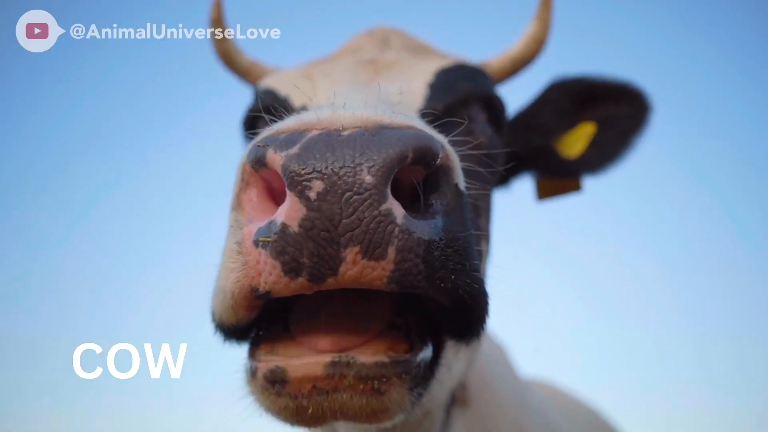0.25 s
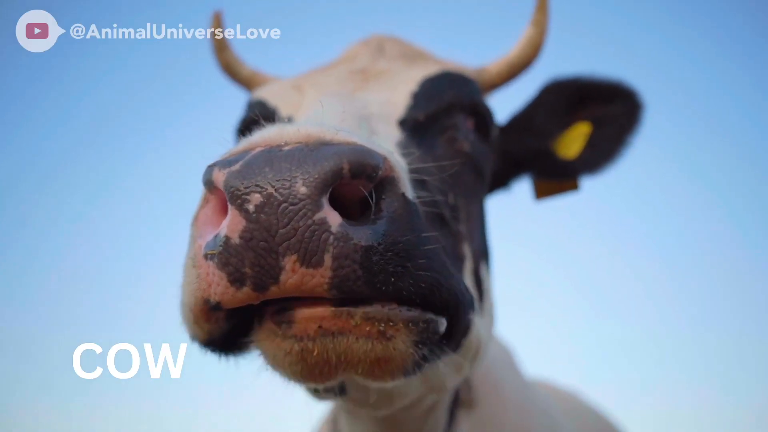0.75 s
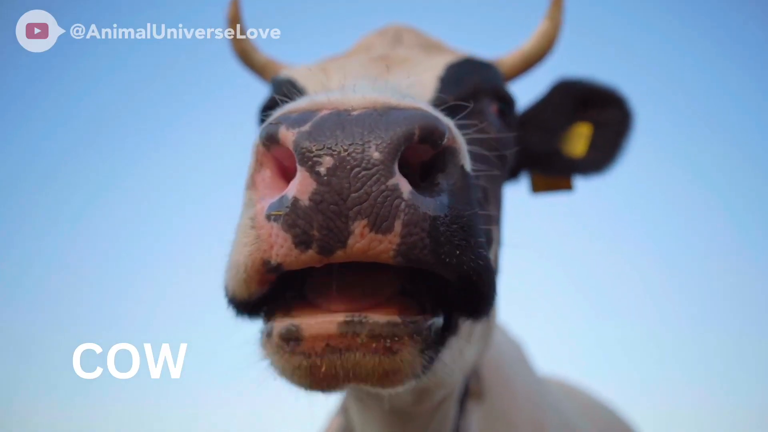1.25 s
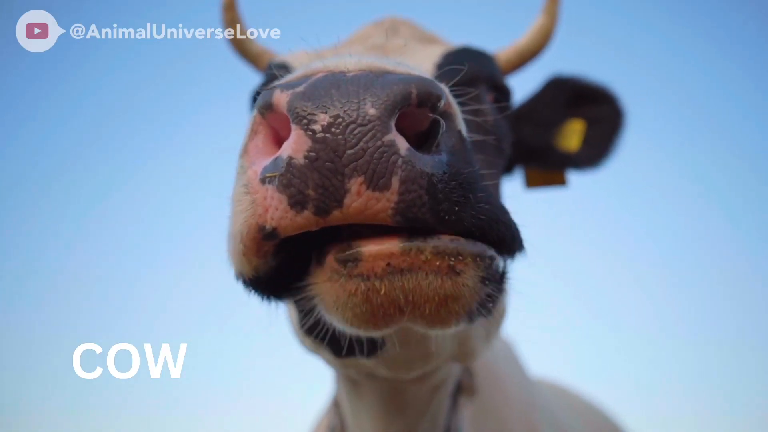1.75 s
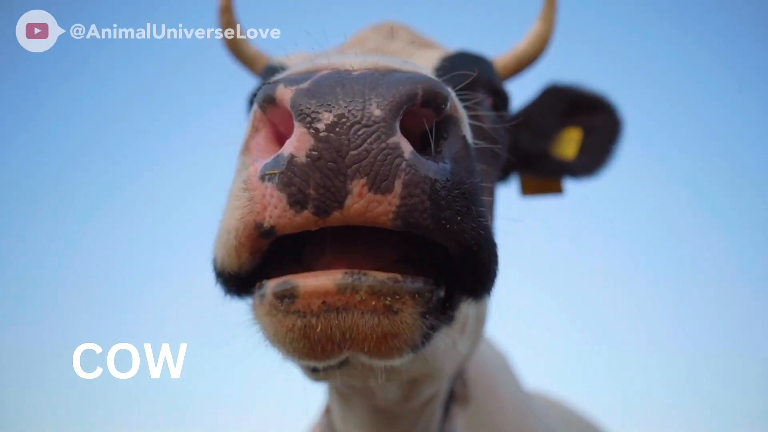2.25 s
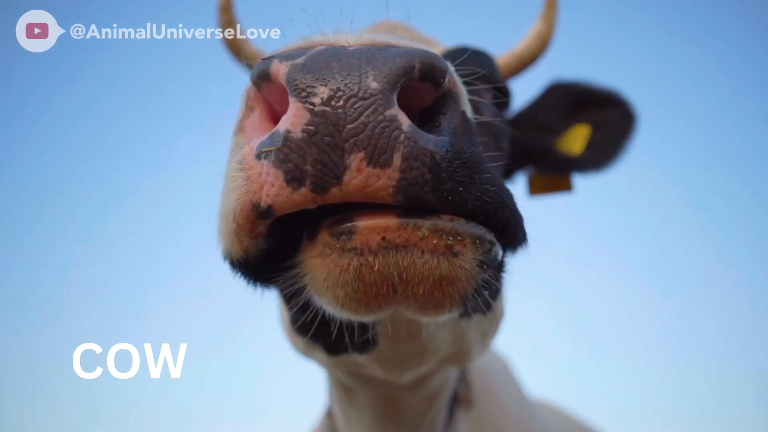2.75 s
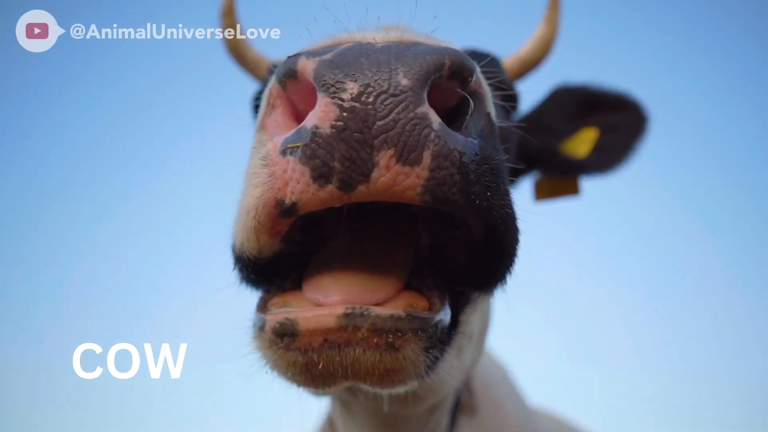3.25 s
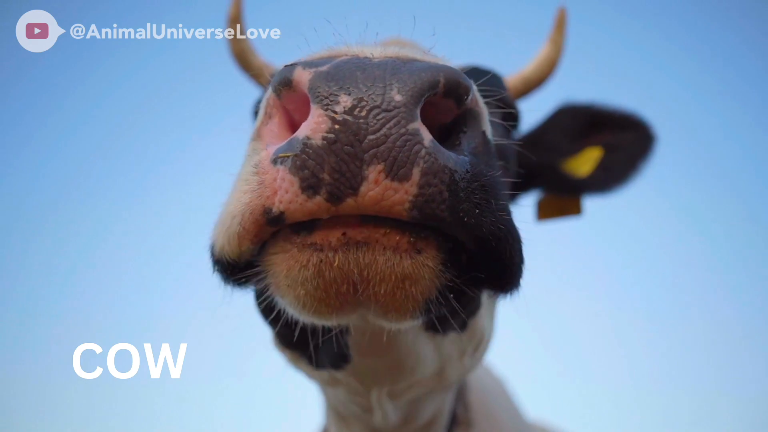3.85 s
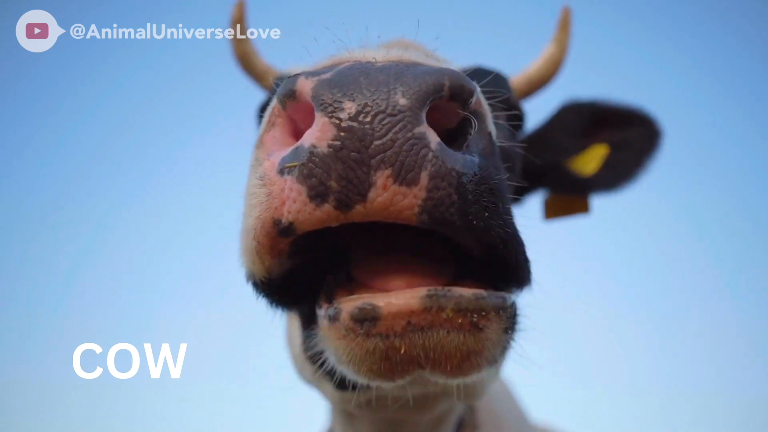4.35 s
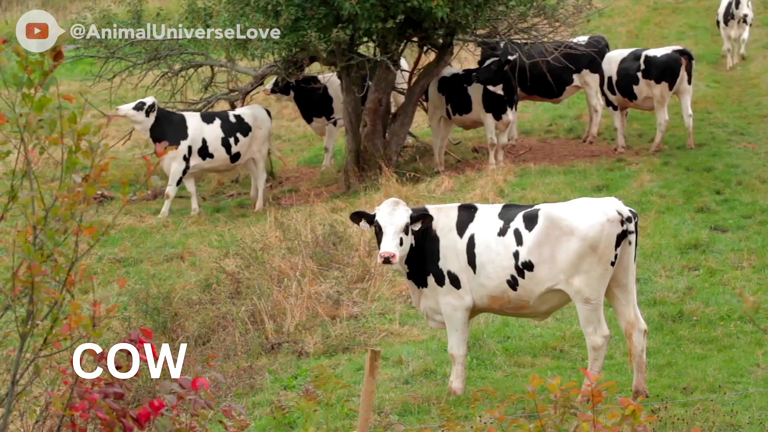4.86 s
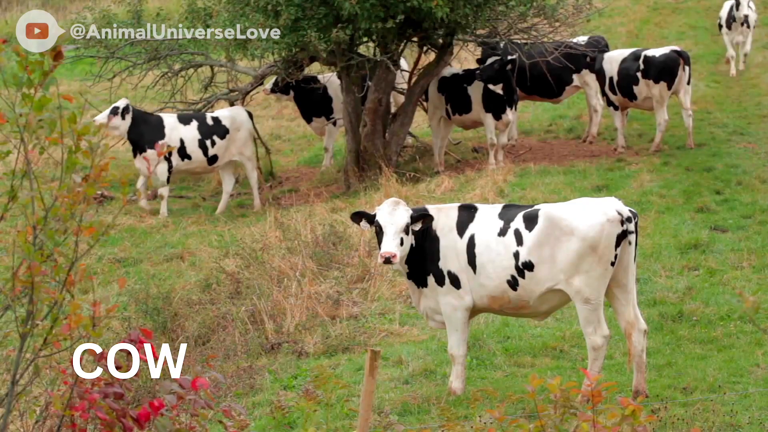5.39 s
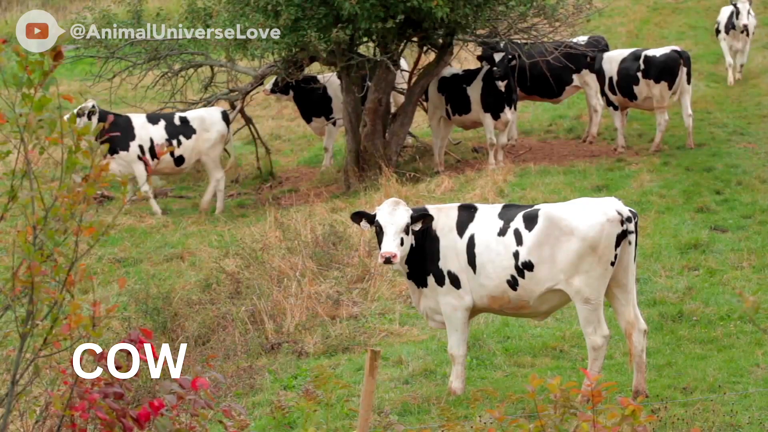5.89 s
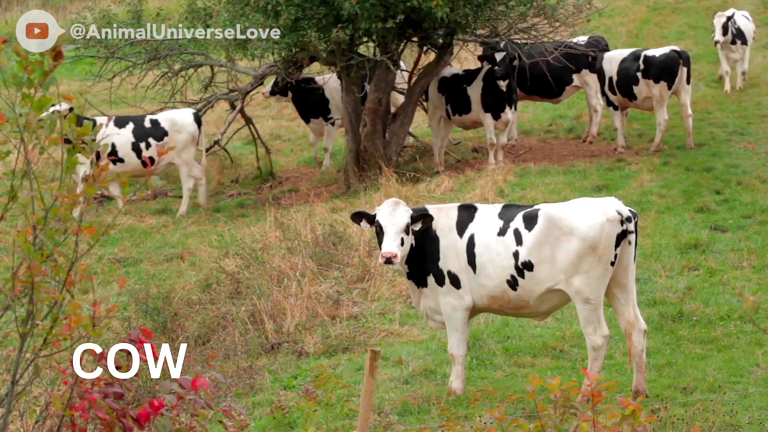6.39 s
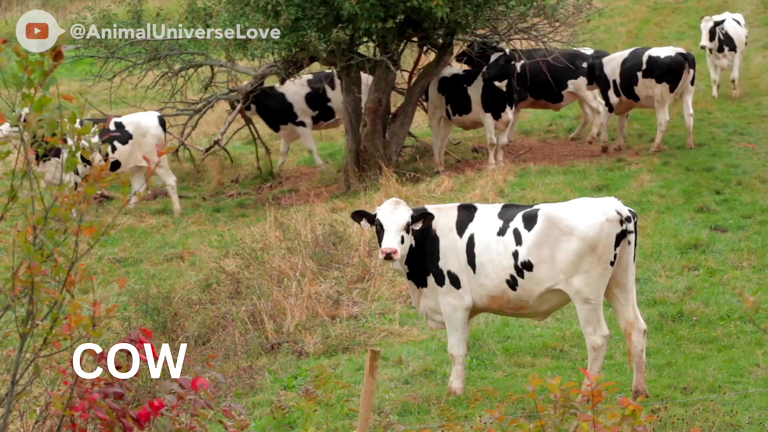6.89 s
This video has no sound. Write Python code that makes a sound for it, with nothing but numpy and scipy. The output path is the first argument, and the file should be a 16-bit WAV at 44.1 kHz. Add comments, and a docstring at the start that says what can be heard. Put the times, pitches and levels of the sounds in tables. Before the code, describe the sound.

Outdoors in a pasture with soft hiss and faint bird whistles, a cow very near the microphone blows air through its nose, chews and gives one hoarse bellow that cracks upward and breaks off. Field wash rises; it blows and chews again. Then three moos come from the herd, with two dull bumps and an irregular tinny cowbell clanking through the later part.

```python
"""Cattle in a pasture, over a soft outdoor hiss and the low wash of the field. Distant birds whistle as gliding tones.
A cow close by blows through her nose (shaped noise), chews (ringing knocks and crunches) and bellows once: vocal fold
pulses pass her throat resonances, her voice cracks upward and breaks. The field wash comes up and she blows and
chews again. Then three moos follow from the herd, made the same way as the bellow, while two dull bumps fall and
a sheet-metal cowbell clanks as ringing modes. Small dry ticks of noise are scattered in between."""
import sys
import numpy as np
from scipy import signal
from scipy.fft import rfft, irfft, next_fast_len
from scipy.io import wavfile
from scipy.ndimage import uniform_filter1d

SR = 44100
rng = np.random.default_rng(int(sys.argv[2]) if len(sys.argv) > 2 else 0)


def transcribe(u):
    """Save the signal u as a 16-bit wav file named by the first command-line argument.

    u: samples, shape (n,) or (channels, n), limited to [-1, 1]; the rate is SR.
    q: integer samples, one column per channel.
    """
    v = np.clip(np.atleast_2d(u).T, -1, 1)
    q = np.round(v * 32767).astype(np.int16)
    wavfile.write(sys.argv[1], SR, q)


N = 314433
T = np.arange(N) / SR  # time in seconds
HZ = np.fft.rfftfreq(4096, 1 / SR)  # frequency grid of the filters

# How the open field gets louder. Each row: time in seconds, level in dB.
FIELD_RISE = [(1.9, -70.5), (2.3, -40.5), (4.2, -38), (4.7, -35.5)]


def amp(db):
    """Decibels to gain."""
    return 10 ** (np.asarray(db) / 20)


def unit(x):
    """Scales to an rms of 1."""
    return x / np.sqrt(np.mean(x ** 2) + 1e-20)


def ramp(t, start, end):
    """Goes from 0 at start to 1 at end, and stays there."""
    return np.clip((t - start) / (end - start), 0, 1)


def bump_curve(t, centre, width):
    """A smooth hump of height 1 around centre."""
    return np.exp(-((t - centre) / width) ** 2)


def curves(rows, t):
    """Every column of a table, joined by straight lines in time."""
    s, *columns = np.transpose(rows)
    return [np.interp(t, s, c) for c in columns]


def colour(points):
    """Gain on the HZ grid from (Hz, dB) points, joined on a log frequency scale."""
    f, db = np.transpose(points)
    return amp(np.interp(np.log(HZ + 1), np.log(f + 1), db))


def through(x, gain):
    """Passes x through a causal (minimum-phase) filter with this gain on the HZ grid."""
    both_sides = np.r_[gain, gain[-2:0:-1]]
    log_gain = np.log(np.maximum(both_sides, 1e-5))
    taps = np.fft.ifft(np.exp(np.conj(signal.hilbert(log_gain)))).real
    return signal.oaconvolve(x, taps)[:len(x)]


def noise(points, size):
    """Noise of rms 1 with a given spectrum."""
    return unit(through(rng.standard_normal(size), colour(points)))


def wander(size, hz):
    """Slow random drift of rms 1, with little left above hz."""
    padded = next_fast_len(size)
    f = np.fft.rfftfreq(padded, 1 / SR)
    spectrum = rfft(rng.standard_normal(padded)) * np.exp(-(f / hz) ** 2)
    return unit(irfft(spectrum, padded)[:size])


def ring(modes, t):
    """Free ringing of (Hz, dB, t60 in seconds) modes, each a sine that dies away."""
    return sum(amp(db) * np.exp(-np.log(1000) * t / t60) * np.sin(2 * np.pi * hz * t)
               for hz, db, t60 in modes)


def resonate(x, hz, width):
    """A steep resonance of gain 1 that follows the curve hz."""
    # turn the wanted pitch down to 0 Hz, smooth twice, turn it back up
    turn, r = np.exp(2j * np.pi * np.cumsum(hz) / SR), np.exp(-np.pi * width / SR)
    smooth = signal.lfilter([1 - r], [1, -r], x / turn)
    return 2 * (turn * signal.lfilter([1 - r], [1, -r], smooth)).real


def add(mix, s, sound):
    """Mixes a sound in at time s."""
    part = mix[max(round(s * SR), 0):][:len(sound)]
    part += sound[:len(part)]


def outdoors(swell_db=1, apart_db=-15, right_db=3):
    """An even hiss, wide in the treble, and the field's low noisy wash, which comes up a little to the right."""
    # Spectrum of the hiss. Each row: frequency in Hz, relative level in dB.
    hiss_colour = [(59, -62), (100, -9), (350, -2.5), (471, -8), (768, -10.5), (1060, -9), (2270, -8),
                   (2580, -6.5), (10700, -14.5), (16000, -25)]
    # Width of the hiss. Each row: frequency in Hz, side level in dB relative to the centre.
    hiss_width = [(2500, -20), (5000, -28.5), (8000, -7), (15000, -7.5)]
    # Spectrum of the open field. Each row: frequency in Hz, relative level in dB.
    field_colour = [(25, 5), (55, -3), (90, 8.5), (125, -2), (170, -0.5), (300, 0.5), (600, -5),
                    (1300, -10.5), (2500, -16), (6000, -23), (15000, -33.5)]
    hiss_db = -45.5

    centre = noise(hiss_colour, N)
    side = through(noise(hiss_colour, N), colour(hiss_width))
    hiss = np.array([centre + side, centre - side])

    wash, apart = noise(field_colour, N), amp(apart_db) * noise(field_colour, N)
    field = np.array([amp(-right_db / 2) * (wash + apart), amp(right_db / 2) * (wash - apart)])
    level_db, = curves(FIELD_RISE, T)
    return amp(hiss_db) * hiss + amp(level_db + swell_db * wander(N, hz=8.7)) * field


def hum():
    """A faint, wavering hum far across the field: a narrow band of low noise that comes up with the field."""
    # One resonance: frequency in Hz, width in Hz, level in dB relative to the field.
    hz, width, db = (119.2, 9.9, -9)
    level_db, = curves(FIELD_RISE, T)
    return amp(level_db + db) * unit(resonate(rng.standard_normal(N), np.full(N, hz), width))


def birds(warble=0.035):
    """Thin whistles far away: sine tones that glide in pitch and warble at random."""
    # Each row: start in seconds, length in seconds, start pitch in Hz, end pitch in Hz, level in dB.
    chirps = [(0.027, 0.14, 2450, 2320, -51), (2.498, 0.078, 2430, 2280, -53),
              (3.741, 0.11, 2800, 2640, -49), (3.895, 0.051, 3330, 2920, -48.5),
              (3.988, 0.038, 2370, 2220, -49), (4.332, 0.11, 2325, 2270, -47.5)]
    out = np.zeros(N)
    for s, length, start_hz, end_hz, db in chirps:
        size = int(length * SR)
        hz = np.linspace(start_hz, end_hz, size) * (1 + warble * wander(size, hz=120))
        whistle = np.sqrt(2) * np.sin(2 * np.pi * np.cumsum(hz) / SR)
        add(out, s, amp(db) * whistle * signal.windows.tukey(size, .5))
    return out


def snorts(flutter_db=2, buffet_rise_db=14, buffet_fall_db=18, hiss_rise_db=8, hiss_fall_db=14, rise_s=0.15):
    """Air hisses out of the cow's nostrils and buffets the microphone: a quick rise, a hold and a long fall."""
    # Each row: start in seconds, length in seconds, hold of the buffeting in seconds, buffeting in dB, hiss in dB.
    blows = [(.09, 0.74, 0.1, -25.5, -37), (3.03, 0.69, 0.19, -25, -37)]
    # Spectrum of the buffeting. Each row: frequency in Hz, relative level in dB.
    buffet_colour = [(12, -29), (20, 3.5), (65, -2), (178, -10), (354, -22.5), (526, -20), (783, -26.5),
                     (857, -29), (1500, -43), (1950, -50), (3300, -120)]
    # Spectrum of the nostril hiss. Each row: frequency in Hz, relative level in dB.
    nose_colour = [(300, -6), (600, -2), (1200, 1), (2500, 7.5), (5000, 1.5), (9000, 3.5), (13000, 0),
                   (16000, -0.5)]
    out = np.zeros(N)
    for s, length, hold, buffet_db, hiss_db in blows:
        t = np.arange(0, length, 1 / SR)
        still_to_rise = ramp(t, rise_s, 0)
        low_db = buffet_db - buffet_rise_db * still_to_rise - buffet_fall_db * ramp(t, rise_s + hold, length)
        high_db = hiss_db - hiss_rise_db * still_to_rise - hiss_fall_db * ramp(t, rise_s, length)
        buffet = noise(buffet_colour, len(t)) * amp(low_db + flutter_db * wander(len(t), hz=29.6))
        hiss = noise(nose_colour, len(t)) * amp(high_db)
        add(out, s, (buffet + hiss) * signal.windows.tukey(len(t), .12))
    return out


def ticks(level_db=-1, decay_s=0.00078):
    """Tiny dry ticks: bright noise that dies away within a few thousandths of a second."""
    # Each row: time in seconds, relative level in dB.
    tick_times = [(0.1107, -22.5), (1.148, -26), (1.233, -24), (4.6832, -22.5), (4.7815, -19),
                  (4.8272, -28), (5.1892, -25)]
    out, t = np.zeros(N), np.arange(1024) / SR
    for s, db in tick_times:
        tick = noise([(1500, -30), (5000, -2.0), (9000, 2.0), (16000, -9)], len(t)) * np.exp(-t / decay_s)
        add(out, s, amp(db + level_db) * tick)
    return out


def chewing(knock_db=-2, crunch_db=-2, crunch_s=0.0073):
    """Teeth meet: the hollow mouth rings as a knock, with a brief noisy crunch of grass."""
    # Each row: time in seconds, relative level in dB, crunch in dB relative to that level.
    bites = [(0.572, -24.5, -28), (0.617, -24.5, -7), (0.654, -23, -10.5), (0.687, -27, -14),
             (0.721, -27, -17), (2.489, -20.5, -27), (2.537, -18.5, -22), (2.777, -27, -22),
             (3.27, -18, -13), (3.374, -17.5, -9.5), (3.421, -11.5, -13.5)]
    # Ringing of the mouth. Each row: frequency in Hz, level in dB, time to fall by 60 dB in seconds.
    jaw_modes = [(336, 12.5, 0.024), (397, -4, 0.093), (540, -7.5, 0.021), (990, -8, 0.045)]
    crunch_colour = [(300, -34), (1200, 10.5), (3000, 5.5), (6000, -6.5), (15000, -24)]  # (Hz, dB)
    out, t = np.zeros(N), np.arange(SR // 8) / SR
    for s, db, bite_db in bites:
        crunch = noise(crunch_colour, len(t)) * np.exp(-t / crunch_s)
        knock = ring(jaw_modes, t) * (1 - np.exp(-t / 0.0047))
        add(out, s, amp(db) * (amp(knock_db) * knock + amp(bite_db + crunch_db) * crunch))
    return out


def moo(t, hz, level_db, fundamental_db, rasp_db, half_db, mouth, bright_db, throat, jitter, shimmer, damping):
    """Vocal fold pulses, period doubling and rasp pass the moving throat; the fundamental sounds clean beneath."""
    # the hoarser the voice, the less steady its pitch
    unsteady = jitter * amp(rasp_db / 2) * wander(len(t), hz=68.0)
    phase = 2 * np.pi * np.cumsum(hz * (1 + unsteady)) / SR
    # the long folds close gradually, so each pulse is spread over the cycle
    pulses = unit(sum(np.cos(k * phase - np.pi * k ** 2 / 20) for k in range(2, 48)))
    # strong and weak pulses alternate, loosely, which puts lines between the harmonics
    doubled = pulses * np.sqrt(2) * np.cos(phase / 2 + 0.43 * wander(len(t), hz=18))
    folds = pulses + amp(half_db) * doubled
    # air rushes through once in every cycle
    rasp = amp(rasp_db) * unit((1 + 0.16 * np.cos(phase)) * rng.standard_normal(len(t)))

    voice = np.zeros(len(t))
    for f, width, db in throat:
        # the open folds damp the resonances, so the rasp meets wider ones
        voice += amp(db) * (resonate(folds, f * mouth, width) + resonate(rasp, f * mouth, width * damping))
    voice = signal.sosfilt(signal.butter(3, 140, "high", fs=SR, output="sos"), voice)
    # an open mouth lets out more of the upper resonances
    upper = signal.sosfiltfilt(signal.butter(2, 1100, "high", fs=SR, output="sos"), voice)
    voice += (amp(bright_db) - 1) * upper
    # even out the loudness, so that level_db alone shapes it
    voice /= np.sqrt(abs(uniform_filter1d(voice ** 2, size=1800)) + 1e-12)
    fundamental = amp(fundamental_db) * np.sqrt(2) * np.cos(phase)
    sound = amp(level_db) * (voice + fundamental) * (1 + shimmer * wander(len(t), hz=45))
    out = np.zeros(N)
    add(out, t[0], sound * signal.windows.tukey(len(t), .02))
    return out


def bellow():
    """The mouth opens as the pitch climbs; the voice is hoarse around the crack and again under the final strain."""
    # Path of the pitch. Each row: time in seconds, pitch in Hz.
    pitch = [(1.29, 107.1), (1.45, 116.8), (1.55, 138.5), (1.582, 183.1), (1.67, 200.2), (1.746, 208.7),
             (1.78, 224.7), (1.87, 244.2), (1.95, 251.8), (2.038, 257.3), (2.18, 244.4)]
    # Throat resonances. Each row: frequency in Hz before the mouth factor, width in Hz, level in dB.
    bellow_throat = [(205, 90, -5), (530, 125, 0.5), (770, 150, -1.5), (1070, 190, -11), (1525, 170, -5.5),
                     (1830, 260, -13), (2290, 130, -13), (2820, 180, -27), (3750, 170, -31.5),
                     (6800, 700, -43.5), (8700, 1500, -49)]
    # How strongly chest and nose carry the fundamental. Each row: pitch in Hz, level in dB relative to the voice.
    chest = [(112, -11.5), (140, -4.5), (178, -3), (198, -1.5), (228, -1), (245, -2.5), (252, -6.5),
             (257, -9)]
    # Her nose rings while the mouth is nearly shut: frequency in Hz, width in Hz, level in dB with the mouth shut.
    nasal_hz, nasal_width, nasal_db = (4620, 200, -19.5)
    # Her chest booms as the voice breaks: frequency in Hz before the mouth factor, width in Hz, level in dB then.
    boom_hz, boom_width, boom_db = (205, 55, -1)
    # it starts as a murmur, bursts out, cracks into the high register and swells until it breaks
    start_s, burst_s, crack_s, strain_s, break_s, end_s = pitch[0][0], 1.37, 1.6, 2.06, 2.2575, 2.33
    attack_s, burst_db, murmur_db = 0.014, -26, -16
    swell_db_per_s, murmur_db_per_s, release_db_per_s = 15, 150, 300
    shut_mouth, open_mouth = 1.058, 0.99  # factors on the throat frequencies

    t = np.arange(round(start_s * SR), round(end_s * SR)) / SR
    hz, = curves(pitch, t)
    opening = (hz - hz.min()) / np.ptp(hz)
    strain = ramp(t, strain_s, break_s) ** 2

    murmur = murmur_db * ramp(t, burst_s, burst_s - attack_s)
    murmur -= murmur_db_per_s * np.maximum(burst_s - attack_s - t, 0)
    level = burst_db + murmur + swell_db_per_s * (t - burst_s) + 0.5 * strain
    level -= release_db_per_s * np.maximum(t - break_s, 0)
    rasp = -5 + 7 * bump_curve(t, crack_s, 0.11) + 15 * strain  # dB
    # pulses alternate most after the crack and under strain (dB)
    half = -28 + 22 * bump_curve(t, 1.8, .15) + 31 * ramp(t, strain_s, strain_s + 0.039)
    mouth = shut_mouth + (open_mouth - shut_mouth) * opening
    bright = 7 * opening - 9 * strain  # dB

    # dividing by mouth keeps the nose at its own pitch
    nose = (nasal_hz / mouth, nasal_width, nasal_db - 26 * opening)
    boom = (boom_hz, boom_width, boom_db - 25 * (1 - strain))
    fundamental = np.interp(hz, *np.transpose(chest))
    return moo(t, hz, level, fundamental, rasp, half, mouth, bright, [*bellow_throat, nose, boom],
               jitter=0.009, shimmer=0.08, damping=1.6)


def herd_moo(row, throat, tensing=1.42):
    """One arch of effort: the folds tense, so pitch and level climb and the voice clears; then it sags and closes."""
    (start, top, end, close_s, start_hz, top_hz, drop_hz, db, swell_db, chest_db, rasp_db, end_rasp_db,
     mouth, drift, bright_db, dulling) = row
    # past its top a moo sinks and fades, then the mouth closes
    sag_hz_per_s, fade_db_per_s, close_db, close_dull_db = 14, 9, 4.5, 12
    # slack folds at the start: hoarse, thin and dull, with more alternating pulses
    slack_rasp_db, slack_chest_db, slack_dull_db, slack_half_db = 20.5, -13.5, 2, 20
    half_below_rasp_db = -25  # half-pitch lines grow with the rasp

    t = np.arange(round(start * SR), round(end * SR)) / SR
    to_go, past = ramp(t, top, start), np.maximum(t - top, 0)
    closing = np.exp((t - end) / close_s)
    slack = to_go ** tensing

    hz = top_hz * (start_hz / top_hz) ** (to_go ** 2) - sag_hz_per_s * past - drop_hz * closing
    level = db - swell_db * slack - fade_db_per_s * past - close_db * closing
    rasp = rasp_db + slack_rasp_db * slack + end_rasp_db * ramp(t, end - 2 * close_s, end - close_s)
    half = rasp + half_below_rasp_db + slack_half_db * slack
    bright = bright_db - slack_dull_db * slack - dulling * past - close_dull_db * closing
    # the long moo dulls for a moment near its top
    bright -= 12 * bump_curve(t, 5.98, .05)
    shape = mouth + drift * (t - top)
    return moo(t, hz, level, chest_db + slack_chest_db * slack, rasp, half, shape, bright, throat,
               jitter=0.0032, shimmer=0.03, damping=2.5)


def bumps(rise_s=0.0031, scuff_db=-15, scuff_s=0.048):
    """Two soft, heavy bumps near the microphone: low ringing modes, each with a short scuff of noise."""
    # Each row: time in seconds, level in dB.
    bump_times = [(5.0641, -3), (5.0945, -4)]
    # Ringing of a bump. Each row: frequency in Hz, level in dB, time to fall by 60 dB in seconds.
    bump_modes = [(171, 1, 0.052), (194, -0.5, 0.054), (376, -3.5, 0.11), (512, -4.5, 0.063),
                  (940, -13.5, 0.051)]
    scuff_colour = [(40, -19), (130, -7.0), (550, -15.5), (1000, -22), (1400, -28), (4000, -33.5),
                    (16000, -50)]  # (Hz, dB)
    out, t = np.zeros(N), np.arange(SR // 4) / SR
    for s, db in bump_times:
        scuff = noise(scuff_colour, len(t)) * np.exp(-t / scuff_s)
        thud = ring(bump_modes, t) + amp(scuff_db) * scuff
        add(out, s, amp(db) * thud * (1 - np.exp(-t / rise_s)))
    return out


def cowbell(level_db=-4, clack_db=-5, clack_s=0.0041, jangle_db=-3, jangle_t60=0.079, spread=0.0179):
    """The clapper hits one wall or another; each place favours its own modes, with a jangle and a clack on top."""
    # Frequencies of the bell's modes in Hz.
    bell_hz = [1935, 2205, 2805, 3165, 3292, 3420, 3458, 4070, 4325, 4546, 5074, 5435, 5620, 6297, 6738,
               7355, 7588, 8108, 8660, 9090, 9237, 9519, 10025, 11035, 11680, 12050, 12635, 13245, 13790,
               15200]
    # Each row, one for each frequency: level in dB, time to fall by 60 dB in seconds,
    # lean in dB (gained when the clapper hits the narrow wall, lost on the broad wall).
    bell_modes = [(-2, 0.49, 1.5), (-27.5, 0.2, 24.5), (-12.5, 0.44, 3), (-12, 0.2, -14), (-13, 0.21, -9),
                  (1, 0.2, -1.5), (-1, 0.14, -11), (-12.5, 0.5, 15.5), (-20.5, 0.67, -14.5), (-7, 0.24, 15),
                  (-5.5, 0.25, 0), (-21, 0.39, 11), (-8, 0.072, -6), (-9.5, 0.27, -2), (-11, 0.25, 5),
                  (-9.5, 0.19, -8.5), (-30, 0.29, 27.5), (-12.5, 0.28, 3), (-8, 0.1, 7.5),
                  (-17.5, 0.1, -4.5), (-8, 0.17, -9), (-19, .18, 16), (-13, 0.26, 5), (-15.5, 0.059, -19),
                  (-9, 0.14, 8), (-23, .14, 5), (-13, 0.16, -2), (-23, .12, -11), (-7, 0.11, 0),
                  (-14, 0.097, -2)]
    # Each row: time in seconds, relative level in dB, place from -1 (broad wall) to 1 (narrow wall).
    strikes = [(5.2857, -23, -0.84), (5.4115, -20.5, 0.47), (5.442, -19.5, -0.82), (5.473, -21, 0.087),
               (5.5392, -16, 0.16), (5.5927, -19.5, -0.12), (5.7204, -15, -0.59), (5.746, -19.5, -0.56),
               (5.8435, -17, -0.65), (5.861, -22.5, 0.87), (5.9513, -23.5, 0.76), (5.9864, -27, 0.41),
               (6.1214, -24, 0.46), (6.2162, -34, -0.42), (6.2632, -23, -0.85), (6.3037, -20, -0.83),
               (6.3504, -23, 0.95), (6.4836, -23, -0.61), (6.5113, -22, 0.59), (6.6567, -30.5, -0.38),
               (6.8078, -34, -0.6)]
    clack_colour = [(1200, -30), (3300, -3), (9000, -1.0), (16000, -14)]  # (Hz, dB)
    out, t = np.zeros(N), np.arange(SR * 3 // 4) / SR
    early = t[:6000]
    hz, (db, t60, lean_db) = np.array(bell_hz), np.transpose(bell_modes)
    modes = np.array([ring([(f, 0, decay)], t) for f, decay in zip(hz, t60)])
    for s, strike_db, place in strikes:
        luck, sign, detune = rng.standard_normal((3, len(hz)))
        # the higher a mode, the more it depends on the exact spot that is hit
        mode_db = db + place * lean_db + luck * hz / 3000
        clank = (np.sign(sign) * amp(mode_db)) @ modes * (1 - np.exp(-t / 0.00015))
        add(out, s, amp(strike_db + level_db) * clank)
        # the seamed walls have short-lived neighbour modes that beat against the main ones
        neighbour_hz = hz * (1 + spread * detune)
        neighbours = [(f, level, jangle_t60) for f, level in zip(neighbour_hz, db)][3:]
        jangle = ring(neighbours, early) * (1 - np.exp(-early / 0.0026))
        clack = noise(clack_colour, len(early)) * np.exp(-early / clack_s)
        add(out, s, amp(strike_db) * (amp(jangle_db) * jangle + amp(clack_db) * clack))
    return out


def echoes(x, t60, wet_db, dull_hz):
    """Scattered reflections from ground, trees and sheds: sparse random taps that die away and lose treble."""
    t = np.arange(SR * 3 // 4) / SR
    hits = rng.random(len(t)) < 2000 / SR  # about 2000 reflections per second
    taps = rng.standard_normal(len(t)) * hits * (t > .006) * np.exp(-np.log(1000) * t / t60)
    tail = through(taps / np.linalg.norm(taps), 1 / np.sqrt(1 + (HZ / dull_hz) ** 2))
    return amp(wet_db) * signal.oaconvolve(x, tail)[:N]


def scene():
    """The near cow and the deep moo stand in the centre; echoes spread the two farther moos to the sides."""
    # Moos of the herd. Each row: start, top, end and closing time in seconds, start pitch, top pitch and final
    # drop in Hz, level in dB, swell in dB, fundamental in dB, rasp in dB, final extra rasp in dB, mouth factor
    # on the throat frequencies, its drift per second, brightness in dB, dulling in dB per second past the top
    # (negative brightens).
    moos = [(4.409, 4.931, 5.08, 0.02, 125.2, 156.2, 9.4, -22.5, 18.5, -22, -21, 3, 1.015, 0.071, -3, -15),
            (5.201, 5.979, 6.6, .11, 87.5, 161.8, 19, -20, 18, -16, -16, 10.5, 1.02, -0.055, 7.5, -22),
            (6.539, 6.958, 7.13, 0.0267, 131.6, 183.7, 14.5, -11.5, 15, -1, -15, 22, .96, 0.079, 7.5, 43)]
    # Throat resonances. Each row: frequency in Hz before the mouth factor, width in Hz, level in dB.
    short_throat = [(623, 49, 5.5), (852, 110, 0), (1245, 170, -10.5), (1820, 91, -13), (2340, 180, -15.5),
                    (2550, 190, -19)]
    long_throat = [(282, 290, -7), (623, 100, 2), (813, 196, -6), (1218, 79, -6.5), (1560, 160, -16.5),
                   (1857, 90, -24), (2210, 130, -18), (2590, 90, -23.5), (2990, 270, -29.5)]
    deep_throat = [(320.7, 125, -1), (575, 37, 7), (843, 105, 0), (1172, 22, -8.5), (1301, 39, -4),
                   (1527, 93, -12), (1768, 190, -18), (2690, 170, -33)]

    near, song = bellow(), birds()
    short, long, deep = (herd_moo(row, throat) for row, throat in zip(moos, (short_throat, long_throat, deep_throat)))
    far = short + long
    mid = near + far + deep + cowbell() + song + snorts() + chewing() + ticks() + bumps() + hum()
    mid += echoes(near, t60=.16, wet_db=-10, dull_hz=4000)
    mid += echoes(far + deep + song, t60=.3, wet_db=-14, dull_hz=3000)
    side = echoes(far, t60=.1, wet_db=-15, dull_hz=2200)
    return np.array([mid + side, mid - side]) + outdoors()


def record(dry):
    """The recorder's band limit: a steep filter that removes what lies above 16 kHz."""
    low_pass = signal.firwin(401, 16000, window=("kaiser", 8), fs=SR)
    return signal.oaconvolve(dry, low_pass[None], "same")


dry = scene()
out = record(dry)
transcribe(out)
```